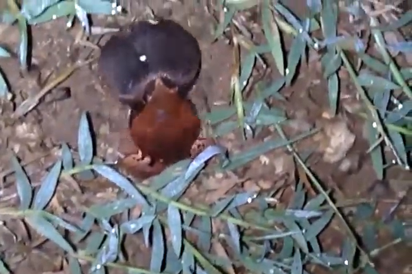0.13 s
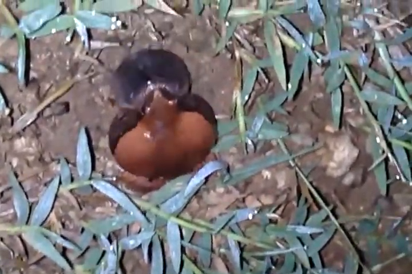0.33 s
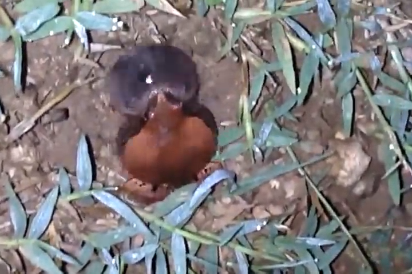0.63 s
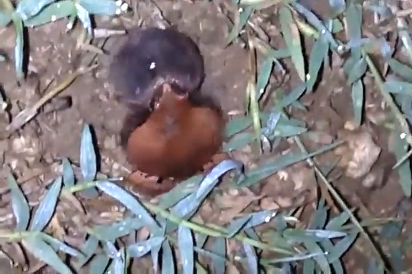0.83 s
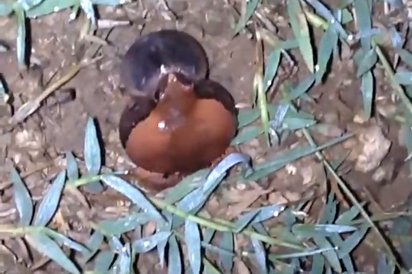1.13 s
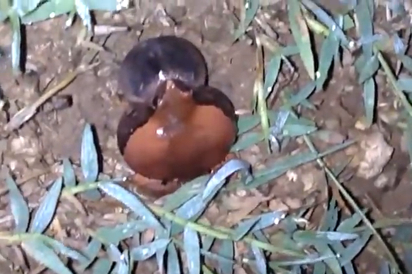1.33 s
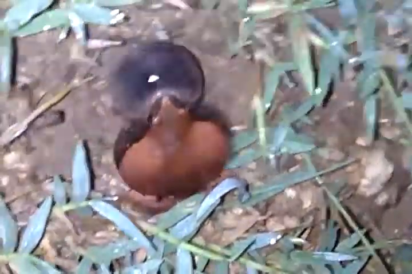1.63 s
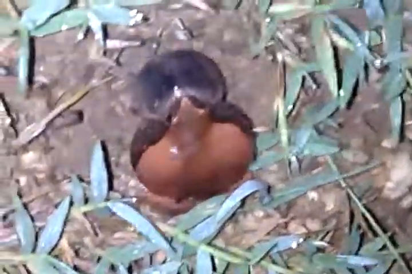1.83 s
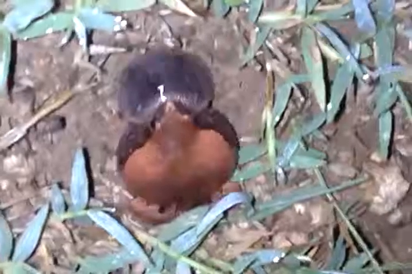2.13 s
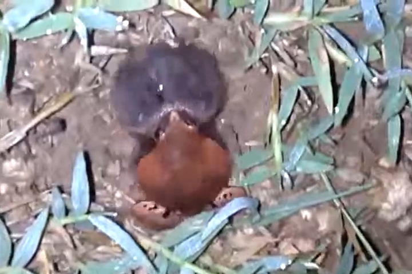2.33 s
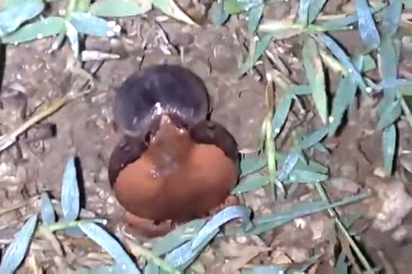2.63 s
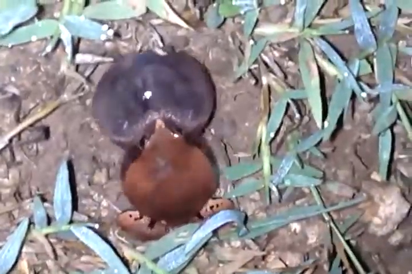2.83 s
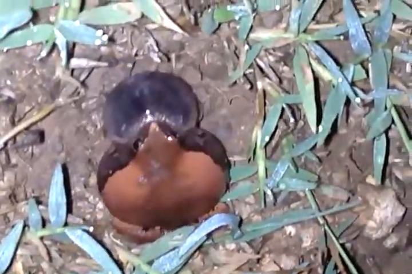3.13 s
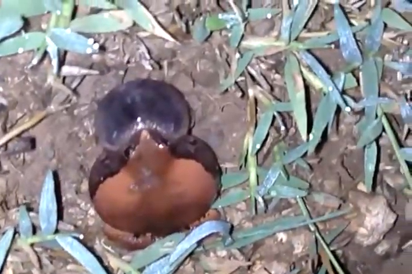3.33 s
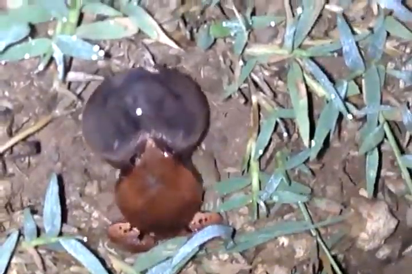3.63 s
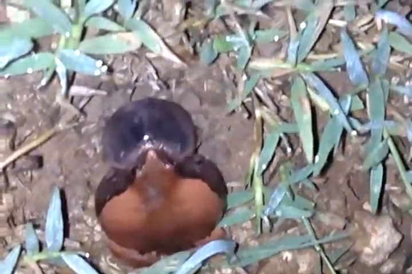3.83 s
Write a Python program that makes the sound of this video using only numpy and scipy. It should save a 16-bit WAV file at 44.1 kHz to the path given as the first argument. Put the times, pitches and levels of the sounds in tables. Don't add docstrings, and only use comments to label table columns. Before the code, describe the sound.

A small frog croaks harshly and very close, six rasping bursts over a trilling night chorus.

```python
import sys
import numpy as np
from scipy import signal
from scipy.fft import rfft, irfft, next_fast_len
from scipy.io import wavfile
from scipy.ndimage import uniform_filter1d

SR = 44100
rng = np.random.default_rng(int(sys.argv[2]) if len(sys.argv) > 2 else 0)


def linear_from_db(decibels):
    return 10 ** (np.asarray(decibels, float) / 20)


def materialize(psi):
    bounded = np.clip(np.atleast_2d(psi).T, -1, 1)
    quanta = np.round(bounded * 32767).astype(np.int16)
    wavfile.write(sys.argv[1], SR, quanta)


N = 176400


def along(points, hz):
    f, v = np.transpose(points)
    return np.interp(np.log(hz + 1), np.log(f + 1), v, -120, -120)


def filtered(x, response):
    m = next_fast_len(N + SR // 2)
    return irfft(rfft(x, m) * response(np.fft.rfftfreq(m, 1 / SR)), m)[..., :N]


def noise(points, patchy_db):
    z = signal.stft(rng.standard_normal(N), nperseg=512)[2]
    patches = uniform_filter1d(uniform_filter1d(rng.standard_normal(z.shape), 6, 0), 10, 1)
    patchy = signal.istft(z * linear_from_db(patchy_db * patches / patches.std()), nperseg=512)[1][:N]
    x = filtered(patchy, lambda hz: linear_from_db(along(points, hz)))
    return x / x.std()


def placed(s, shape, size):
    i = np.ceil(s * SR).astype(int)[:, None] + np.arange(size)
    slots = np.clip(i, -1, N).ravel() + 1
    return np.bincount(slots, shape(i / SR - s[:, None]).ravel(), N + 2)[1:-1]


def rings(s, hz, db, t60, attack_s):
    hz, db = np.reshape(hz, (-1, 1)), np.reshape(db, (-1, 1))

    def tone(t):
        envelope = linear_from_db(db - 60 * t / t60) * (1 - np.exp(-t / attack_s))
        return envelope * np.sin(2 * np.pi * hz * t)
    return placed(s, tone, size=1400)


def field(x, db):
    t60 = 0.08
    tail = rng.standard_normal(SR // 4) * linear_from_db(-60 * np.arange(SR // 4) / SR / t60)
    return x + linear_from_db(db) * signal.fftconvolve(x, tail / np.linalg.norm(tail))[:N]


def air():
    # (f/Hz, level/dB)
    hiss = [(300, 2), (4500, -17.5), (6500, 2.5), (8000, -8.5), (11000, -14.5), (17000, -14)]
    # (f/Hz, level/dB)
    rumble = [(12, -27.5), (20, 10), (53, -2.5), (124, -13.5), (203, -14.5), (263, -23), (600, -31.5),
              (780, -63), (1320, -120)]
    return linear_from_db(-53) * noise(hiss, patchy_db=-3.5) + linear_from_db(-35.5) * noise(rumble, patchy_db=3.5)


def chorus():
    # (f/Hz, level/dB)
    hum = [(150, -40.5), (600, -32.5), (850, -19), (1100, -1.5), (2400, -8.5), (3300, 2), (4100, -11),
           (4800, -47.5)]
    # (f/Hz, spread of pitch [natural log], rate [peeps a second], level/dB)
    peeps = [(1160, 0.089, 65, -31.5), (2010, 0.09, 54, -36.5), (3050, .07, 150, -16.5),
             (3466, 0.071, 140, -35.5), (6000, 0.012, 100, -44)]
    peep_t60, scatter_db, attack_s = 0.02, 2.5, 0.0019
    out = linear_from_db(-29) * noise(hum, patchy_db=4)
    for hz, spread, rate, db in peeps:
        luck, waits = rng.standard_normal((700, 2)), rng.gamma(4, 1 / 4, size=700)
        s = np.cumsum(waits) / rate
        on = s < N / SR
        out += rings(s[on], hz * np.exp(spread * luck[on, 0]), db + scatter_db * luck[on, 1],
                     peep_t60, attack_s)
    return out


def trills():
    # (t/s, level/dB)
    efforts = [
        [(-.2, -30), (-.17, -14), (0, -14.5), (.15, -15), (.26, -22), (.33, -33.5), (.37, -50)],
        [(.84, -20), (.87, -18), (.9, -15.5), (1.04, -13.5), (1.3, -15.5), (1.36, -20), (1.38, -53)],
        [(1.93, -35.5), (1.95, -21.5), (1.98, -16.5), (2.16, -12.5), (2.41, -17), (2.54, -26.5), (2.61, -49)],
        [(2.99, -28), (3.03, -17.5), (3.2, -13.5), (3.36, -14.5), (3.5, -17), (3.54, -22.5), (3.56, -52)],
        [(.41, -38.5), (.45, -29.5), (.62, -25.5), (.75, -23.5), (.9, -27.5), (.98, -33)],
        [(3.5, -40), (3.56, -22.5), (3.75, -23), (3.9, -25.5), (4.05, -24.5)],
        [(2.3, -34.5), (2.42, -21), (2.62, -40)],
        [(3.7, -41.5), (3.84, -20), (4.1, -31)],
    ]
    pulses = [
        [(0.022, 152.8), (0.05, 152.5), (0.25, 147.8), (0.3, 147.6)],
        [(0.88, 158.1), (0.92, 158.8), (0.99, 156.9), (1.06, 153.3), (1.16, 153.0), (1.22, 151.0),
         (1.32, 149.1), (1.355, 151.3)],
        [(1.96, 157.1), (2.03, 159.7), (2.08, 156.4), (2.12, 153.9), (2.2, 153.4), (2.41, 150.0), (2.48, 147.5),
         (2.54, 151.3)],
        [(3.02, 158.2), (3.08, 158.6), (3.13, 156.4), (3.19, 154.5), (3.26, 153.0), (3.32, 153.0),
         (3.48, 149.8), (3.53, 153.7)],
        [(0.48, 157.8), (0.55, 157.7), (0.62, 157.8), (0.68, 156.3)],
        [(3.76, 155.9), (3.82, 154.0), (3.9, 153.6), (3.97, 153.9)],
    ]
    note_hz, hz_per_db, ref_db = 3746, 15.5, -14.5
    start_sag_hz, warm_up_s = 200, 0.091
    jitter_s, scatter_db = .000008, .3
    rise_s, fall_s, gain_db, top_db = 0.00065, 0.00072, 9.5, -4.8
    edge_db, edge_s = -16, 0.00044
    upper_hz, upper_db = 4720, -32
    echo_s, echo_db = .0031, -9
    out = np.zeros(N)
    for call, rate in zip(efforts, pulses + [pulses[4]] * 2):
        s, level = np.transpose(call)
        t = np.arange(s[0], s[-1], 1 / SR)
        turns = np.cumsum(np.interp(t, *np.transpose(rate))) / SR
        at = np.interp(np.arange(int(turns[-1])), turns, t)
        luck = rng.standard_normal((140, 2))[:len(at)]
        at = at + jitter_s * luck[:, 0]
        db = np.interp(at, s, level)[:, None]
        sag_hz = start_sag_hz * np.exp(-(at[:, None] - s[0]) / warm_up_s)
        hz = note_hz + hz_per_db * (db - ref_db) - sag_hz
        pip_db = np.minimum(db + gain_db, top_db) + scatter_db * luck[:, 1:]

        def pip(u):
            u = u - .0016
            body = np.exp(-(u / np.where(u < 0, rise_s, fall_s)) ** 2 / 2)
            edge = linear_from_db(edge_db) * np.exp(-((u + 0.00036) / edge_s) ** 2 / 2)
            tone = np.sin(2 * np.pi * hz * u) + linear_from_db(upper_db) * np.sin(2 * np.pi * upper_hz * u)
            return (body + edge) * tone
        out += placed(at, lambda u: linear_from_db(pip_db) * (pip(u) + linear_from_db(echo_db) * pip(u - echo_s)), size=400)
    return out


def bouts(table, period, modes, attack_s):
    jitter_s, scatter_db, pitch_scatter = .0008, 2, 0.0061
    s0, many, db = np.transpose(table)[:, :, None]
    k, luck = np.arange(9), rng.standard_normal((len(table), 9, 3))
    on = k < np.round(many)
    s = (s0 + period * k + jitter_s * luck[..., 0])[on]
    db = (db + scatter_db * luck[..., 1])[on]
    pitch = 1 + pitch_scatter * luck[on, 2]
    return sum(rings(s, hz * pitch, db + level, t60, attack_s) for hz, level, t60 in modes)


def ticking_caller():
    # (t/s, number of ticks, level/dB)
    runs = [(-.09, 8, -13.5), (.165, 9, -20.5), (.418, 9, -18), (.65, 8, -16.5), (.9043, 8, -23.5),
            (1.155, 8, -20), (1.4147, 8, -17), (1.6646, 8, -17.5), (1.9225, 8, -15), (2.165, 8, -16.5),
            (2.406, 9, -15.5), (2.6853, 8, -18), (2.89, 6, -12.5), (3.1168, 8, -15), (3.3972, 8, -15),
            (3.668, 9, -17.5), (3.9434, 3, -18.5)]
    # (f/Hz, level/dB, t60/s)
    modes = [(3170, 3.5, 0.017), (6320, -15.5, 0.013)]
    return bouts(runs, .0261, modes, attack_s=.0012)


def croaks(table, tires_db=0):
    # (f/Hz, rise over the croak/Hz, level/dB, change over the croak/dB,
    # t60/s, attack/s, start below the mode/Hz, second click/dB)
    modes = [(978, 30, 1, -12.5, 0.023, 0.0015, -350, -4), (1270, 180, 7.5, -8, 0.0063, 0.00048, 100, -5.5),
             (1569, 110, -.5, -5, 0.0081, 0.001, 296.5, -1),
             (1937.6, 167, -0.5, 10, 0.013, 0.00067, 595, -0.1)]
    slow_start_s, hurry, jitter_s = .0025, 3, .0005
    twin_s, twin_db = .0047, 0.8
    last_db, last_twin_db, last_sag = -12.5, -8.5, .05
    glide_s, choke, choke_s = .0005, .85, .0004
    drier = 0.3
    scatter_db, scatter_pitch = 1.2, .006
    rasp_db, rasp_t60 = -22, .008

    s0, pairs, period, db = np.transpose(table)[:, :, None]
    k, luck = np.arange(12), rng.standard_normal((len(table), 12, 12))
    into = period * k + slow_start_s * hurry * (1 - np.exp(-k / hurry))
    on = k < np.round(pairs)
    last = (k >= 10) & (pairs > 0)
    s = (s0 + into + jitter_s * luck[..., 0] * np.clip(k / hurry / 2, 0, 1))[on]
    fill = (into / 0.14)[on]
    db = (db + last_db * last)[on]
    luck, last = luck[on], last[on]
    gap = twin_s + jitter_s * luck[:, 1]

    def col(first, second):
        return np.r_[first, second][:, None]
    s = np.r_[s, s + gap]
    choked = col(gap, gap + 1)
    second = col(0 * gap, 0 * gap + 1)
    fill = col(fill, fill)
    db = col(db, db + twin_db + last_twin_db * last) + tires_db * fill ** 3
    sag = last_sag * col(last, last)
    luck = np.r_[luck[:, 2:7], luck[:, 7:]]
    pitch = 1 + scatter_pitch * luck[:, 4:] - sag

    def click(t):
        choking = 1 / (1 + np.exp(-np.clip((t - choked) / choke_s, -50, 50)))
        left = 1 - np.clip(choke * fill ** 0.23, 0, 1) * choking
        total = 0
        for m, (hz, rise, level, grow, t60, attack, low, twin) in enumerate(modes):
            mode_db = db + level + grow * fill + twin * second + scatter_db * luck[:, [m]]
            envelope = linear_from_db(mode_db - 60 * t / t60 / (1 - drier * fill)) * (1 - np.exp(-t / attack))
            glide = low * glide_s * (1 - np.exp(-t / glide_s))
            total = total + envelope * np.sin(2 * np.pi * ((hz + rise * fill) * pitch * t - glide))
        return -left * total
    breath = noise([(300, -49.0), (1000, -18.5), (2300, -11), (3000, 7.0), (8000, -8.0)], patchy_db=-2.0)
    rasp = placed(s, lambda t: linear_from_db(db + rasp_db - 60 * t / rasp_t60), size=800) * breath
    return placed(s, click, size=1200) + rasp


def far_neighbours():
    # (t/s, level/dB)
    calls = [(-.05, -16.5), (0.268, -13.5), (0.585, -17.5), (.927, -14), (1.109, -23.5), (1.3, -17.5),
             (1.655, -13.5), (1.885, -27), (2.08, -17), (2.384, -13), (2.675, -21.5), (3.12, -31.5),
             (3.23, -22.5), (3.418, -23.5), (3.772, -17.5)]
    pairs, period_s, tires_db = 11, .0139, -6
    top_hz, low_hz = 3600, 970
    x = croaks([(s, pairs, period_s, db) for s, db in calls], tires_db)
    return filtered(x, lambda hz: 1 / (1 + 1j * hz / top_hz) / (1 + (low_hz / (hz + 1)) ** 6))


def knocking_caller():
    # (t/s, number of knocks, level/dB)
    runs = [(.016, 2, -18), (.4648, 1, -33), (.6564, 1, -11.5), (1.1, 5, -13), (1.377, 3, -13.5),
            (1.668, 3, -14), (1.8537, 1, -34), (2.0148, 2, -9.5), (2.153, 2, -11.5), (2.5117, 1, -15),
            (2.5575, 7, -15.5), (2.978, 4, -40), (3.2176, 1, -17), (3.298, 4, -19), (3.485, 3, -14),
            (3.825, 3, -10.5)]
    # (f/Hz, level/dB, t60/s)
    modes = [(1357, -2, 0.019), (1760, 1.5, 0.0054), (2550, 4, 0.0079)]
    return bouts(runs, .0412, modes, attack_s=.0015)


def near_frog():
    # (t/s, number of click pairs, click period/s, level/dB)
    calls = [
        (.0767, 11, .01367, 12),
        (.7066, 10, .01365, 12),
        (1.4863, 10, .01403, 12),
        (2.2261, 11, .0136, 12),
        (2.8342, 11, .01387, 12),
        (3.5811, 11, .01404, 12),
    ]
    return croaks(calls)


def crackles():
    # (t/s, peak level/dB)
    events = [
        (0.9628, -26),
        (1.0005, -26.5),
        (2.108, -46.5),
        (2.1386, -43.5),
        (2.165, -15.5),
        (2.1991, -20.5),
        (3.245, -52.5),
    ]
    t60, gain_db = .0015, 1
    s, db = np.transpose(events)
    grit = noise([(3000, -22), (6000, 3.5), (17000, 3.5)], patchy_db=-2.5)
    return grit * placed(s, lambda t: linear_from_db(db[:, None] + gain_db - 60 * t / t60), size=200)


def scene():
    far = far_neighbours() + ticking_caller() + knocking_caller()
    mix = air() + chorus() + field(trills(), -13) + field(far, -20.5) + field(near_frog(), -22) + crackles()
    return mix[None]


def band_limit(x):
    return signal.sosfilt(signal.butter(12, 17080, fs=SR, output="sos"), x)


def record(dry):
    # (f/Hz, level/dB)
    smear = [(300, -12.5), (2500, -6.5), (6000, -11.5), (10000, -15), (17000, -15)]
    clip_up, clip_down, hard = .8, .75, 40
    bass_hz, bass_q = 49.6, 1.4
    shelf_hz, shelf_db = 7540, -6
    top_hz, top_db = 17080, -45
    ceiling = np.where(dry > 0, clip_up, clip_down)
    x = dry / (1 + np.abs(dry / ceiling) ** hard) ** (1 / hard)

    lost = np.minimum(np.abs(dry - x), .3) ** 2
    spread = np.abs(uniform_filter1d(uniform_filter1d(lost, size=300), size=300))
    x = x + linear_from_db(-7.5) * np.sqrt(np.roll(spread, shift=120, axis=1)) * noise(smear, patchy_db=-0.5)

    def response(hz):
        band = np.where(hz < top_hz, 1, linear_from_db(top_db))
        shelf = (1 + 1j * linear_from_db(shelf_db) * hz / shelf_hz) / (1 + 1j * hz / shelf_hz)
        bass_cut = hz ** 2 / (hz ** 2 - bass_hz ** 2 - 1j * hz * bass_hz / bass_q)
        return band * shelf * bass_cut
    return band_limit(filtered(x, response))


dry = scene()
out = record(dry)
materialize(out)
```